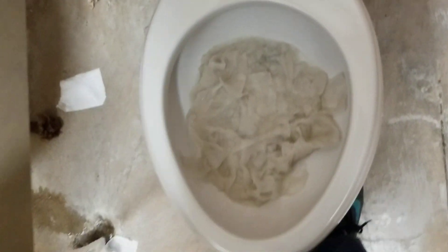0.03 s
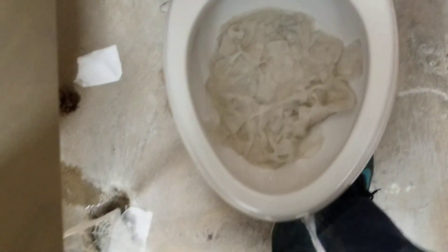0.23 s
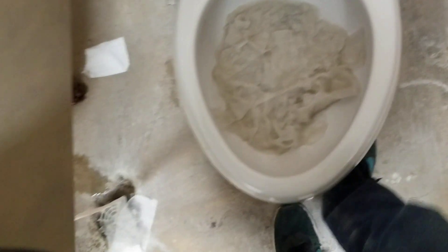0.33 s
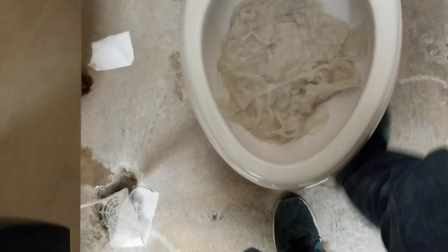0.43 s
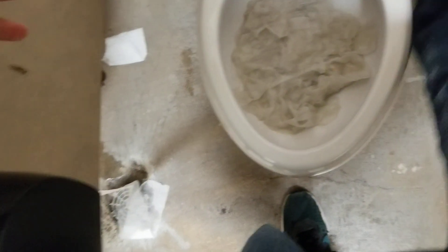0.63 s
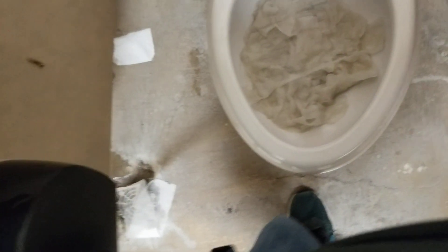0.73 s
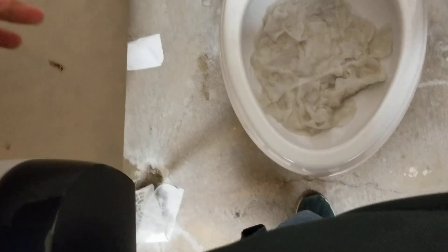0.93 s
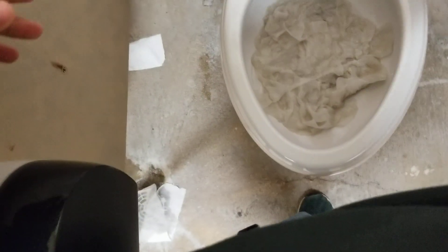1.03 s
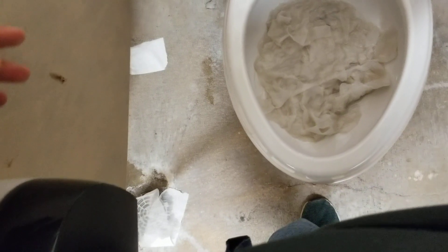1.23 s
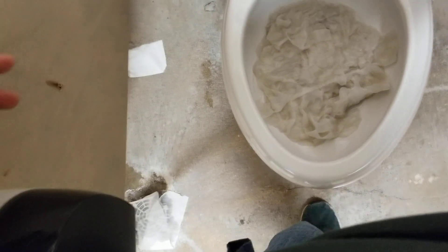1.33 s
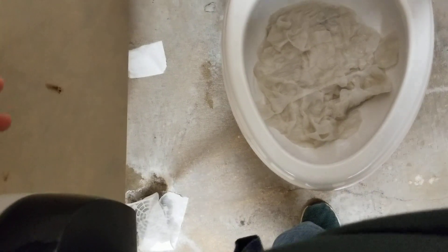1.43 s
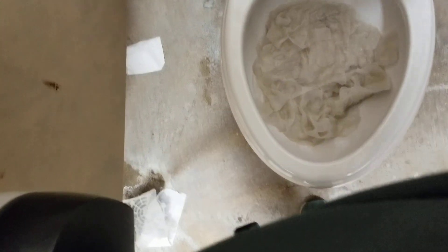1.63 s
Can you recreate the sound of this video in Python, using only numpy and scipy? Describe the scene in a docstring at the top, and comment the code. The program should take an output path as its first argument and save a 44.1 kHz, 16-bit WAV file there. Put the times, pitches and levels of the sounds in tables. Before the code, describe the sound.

In a hard, echoing bathroom, a stall door slams, booms and clatters as it settles. A lighter knock of the door follows, while close clothing rustles softly and a shoe slides faintly over low room rumble.

```python
"""In a hard, echoing bathroom, a toilet stall door bangs against its frame, rebounds and rattles to rest.
Each impact cracks, excites the damped modes of the door and sets the room reverberating, while the
panel's lowest mode booms under the clatter. Friction makes clothes rustle close to the microphone and
a shoe slide faintly, over a low room rumble. Near the end the door is knocked again, lightly."""
import sys
import numpy as np
from scipy import signal
from scipy.fft import rfft, irfft, next_fast_len
from scipy.io import wavfile

SR = 44100
rng = np.random.default_rng(int(sys.argv[2]) if len(sys.argv) > 2 else 0)


def bounce(signal):
    """Save signal as a 16-bit WAV file at the path given by the first command-line argument."""
    frames = np.transpose(np.atleast_2d(signal))
    limited = np.clip(frames, -1, 1)
    pcm = np.round(limited * 32767).astype(np.int16)
    wavfile.write(sys.argv[1], SR, pcm)


N = 74970
T = np.arange(N) / SR
RISE_CYCLES = 1.2  # a resonance builds up over a number of periods, so bass swells slowest
# correlation between the two channels (f/Hz, coherence/1)
COHERENCE = [(60, .999), (130, 1), (280, 0.9), (550, .62), (1000, 0.03), (2500, 0.03), (16000, 0)]


def amp(db):
    """Amplitude ratio of a level in decibels."""
    return 10 ** (np.asarray(db) / 20)


def curve(points, hz):
    """Interpolation on a logarithmic frequency axis."""
    f, value = np.transpose(points)
    return np.interp(np.log(hz + 1), np.log(f + 1), value)


def add(mix, s, sound):
    """Superposition: a sound joins the mix at s seconds."""
    part = mix[:, round(s * SR):][:, :sound.shape[-1]]
    part += sound[..., :part.shape[1]]


def pan(db):
    """Level difference between the channels; positive is to the left."""
    return amp(np.array([[db], [-db]]) / 2)


def diffuse_spectra(white):
    """Diffuse-field coherence: two channels agree at long wavelengths and part at short ones."""
    spectra = rfft(white)
    hz = np.fft.rfftfreq(white.shape[1], 1 / SR)
    coherence = curve(COHERENCE, hz)
    mid = np.sqrt((1 + coherence) / 2) * spectra[0]
    side = np.sqrt((1 - coherence) / 2) * spectra[1]
    return hz, np.array([mid + side, mid - side])


def noise(colour):
    """Spectral shaping of white noise gives steady, coloured stereo noise."""
    hz, spectra = diffuse_spectra(rng.standard_normal((2, next_fast_len(N, True))))
    return irfft(spectra * amp(curve(colour, hz)))[:, :N]


def background():
    """Ambient noise: a rumble, amplitude-modulated by movement, under a steady hiss."""
    # spectra of the room's hiss and of the rumble of room and handled microphone (f/Hz, level/dB)
    hiss_colour = [(20, -53), (500, -53.5), (1000, -52.5), (2200, -58.5), (4500, -54.5), (8000, -58),
                   (16000, -69)]
    rumble_colour = [(20, -42), (45, -29), (80, -19.5), (125, -24.5), (185, -34), (250, -29), (330, -40.5),
                     (480, -38), (800, -51), (2000, -62), (16000, -80)]
    # envelope of the rumble (t/s, level/dB)
    rumble_level = [(0, -4.5), (.17, 0), (.6, -0.5), (1.0, -4), (1.15, -4), (1.25, -0.5), (1.35, -2.5),
                    (1.45, 2), (1.55, -4), (1.63, 4), (1.7, 7)]
    return noise(rumble_colour) * amp(np.interp(T, *np.transpose(rumble_level))) + noise(hiss_colour)


def shoes():
    """Sliding friction: a sole gives faint swells of noise as the weight shifts."""
    # dry slides on the floor (centre t/s, half-width t/s, level/dB)
    slides = [(0.085, 0.2, -4.5), (1.614, 0.046, 0)]
    # spectrum of a slide (f/Hz, level/dB)
    colour = [(100, -48), (350, -35), (600, -38), (1100, -45), (1800, -47), (3000, -50), (6000, -62),
              (16000, -85)]
    return noise(colour) * sum(amp(db) * np.exp(-((T - s) / half) ** 2) for s, half, db in slides)


def clothes():
    """Friction noise of cloth: grainy rubbing and thin scuffs on the right, soft swishes of a sleeve."""
    # envelope of the rubbing (t/s, level/dB)
    rub_level = [(0, -5.5), (.11, -1.5), (.19, -7.5), (.4, 1.5), (.62, 3.5), (.77, 0.5), (.87, 0),
                 (.97, -2), (1.05, 2), (1.1, -5), (1.16, -2), (1.26, -2.5), (1.4, -2), (1.47, 0),
                 (1.61, -1), (1.7, 7)]
    # sudden scuffs (onset t/s, level/dB, fade t/s)
    scuffs = [(.789, 5, 0.046), (1.298, -3, 0.049), (1.618, 3, 0.063)]
    # sleeve swishes (peak t/s, rise t/s, fall t/s, level/dB)
    swishes = [(.12, 0.035, 0.1, -4), (1.04, 0.04, 0.13, -1.5)]
    # spectra of the three (f/Hz, level/dB)
    rub_colour = [(1000, -68), (4000, -63.5), (7000, -62), (9000, -56.5), (11000, -56), (13000, -51.5),
                  (16000, -56.5)]
    scuff_colour = [(1000, -80), (7000, -68), (9500, -53), (11000, -50), (12000, -54), (13200, -43),
                    (16000, -51)]
    swish_colour = [(500, -58), (2500, -62.5), (3600, -45.5), (4500, -41.5), (5800, -53), (9000, -54),
                    (16000, -76)]
    grain_db, scuff_rise_s = 1.7, 0.0026
    grain = amp(grain_db * np.repeat(rng.standard_normal(N), 64)[:N])
    bursts = sum(amp(db) * np.clip((T - s) / scuff_rise_s, 0, 1) * np.exp(-abs(T - s) / fade_s)
                 for s, db, fade_s in scuffs)
    swells = sum(amp(db) * np.exp(-((T - s) / np.where(T < s, rise, fall)) ** 2)
                 for s, rise, fall, db in swishes)
    rubbing = noise(rub_colour) * amp(np.interp(T, *np.transpose(rub_level)))
    scuffing = bursts * noise(scuff_colour)
    return (rubbing + scuffing) * grain * pan(db=-11) + swells * noise(swish_colour)


def panel(hz=85.9, t60=3.8, rise_s=0.014, stop_s=0.023):
    """Free vibration: the panel's lowest mode booms on until contact damps it."""
    # booms of the whole panel (onset t/s, level/dB, free vibration t/s)
    booms = [(0.211, -27, .335), (0.770, -41, 0.22), (1.405, -36, .06), (1.605, -44, .1)]
    out = np.zeros((2, N))
    for s, db, free_s in booms:
        envelope = np.minimum(T / rise_s, 1) * amp(db - 60 * T / t60)
        damping = np.exp(-np.maximum(T - free_s, 0) / stop_s)
        add(out, s, envelope * damping * np.sin(2 * np.pi * hz * T))
    return out


def excitation_db(hz, bass_db, tilt_db, note_hz):
    """Excitation spectrum: heavy blows add bass, hard ones treble; the struck spot favours its note."""
    note_lift = np.exp(-(np.log2((hz + 1) / note_hz) / 0.67) ** 2)
    return bass_db / (1 + (hz / 350) ** 2) + tilt_db * np.log2(1 + hz / 900) + note_lift


def reverberation(touch, ripple, size=65536, rise_s=0.0075, early_db=6, early_s=0.039):
    """Diffuse reverberation: each band builds up and decays exponentially at its own rate."""
    # spectrum of the bathroom's echo before it decays (f/Hz, level/dB)
    colour = [(40, -32), (75, -13), (125, -13), (190, -18), (240, -5), (278, -12.5), (330, -10), (400, -14),
              (500, -9.5), (600, -8), (680, -7), (760, -17), (950, -16), (1200, -18), (1750, -13),
              (2200, -23), (2650, -17), (3300, -19.5), (3800, -25), (5100, -25.5), (6300, -33),
              (8500, -37.5), (16000, -42)]
    # reverberation time by band (f/Hz, T60/s)
    bands = [(80, 1.4), (250, 1.49), (600, 1.58), (1200, 1.25), (2000, 1.14), (3500, 0.92), (6000, 0.73),
             (12000, 0.32)]
    t = np.arange(size) / SR
    hz, spectra = diffuse_spectra(rng.standard_normal((2, size)))
    spectra *= amp(curve(colour, hz) + curve(ripple, hz) + excitation_db(hz, *touch))
    spectra *= np.where(hz > 750, pan(db=-2.5), 1)
    centres = [f for f, _ in bands]
    out = 0
    for (f, t60), weights in zip(bands, np.eye(len(bands))):
        band = irfft(spectra * curve(np.c_[centres, weights], hz))
        build_up = 1 - np.exp(-(t / (rise_s + RISE_CYCLES / f / 2)) ** 2)
        out += band * build_up * amp(-60 * t / t60)
    return out * amp(early_db * np.exp(-t / early_s))  # stronger while still inside the stall


def ring(touch, size=65536, phase_spread=0.9):
    """Damped oscillation: decaying tones whose phases part between the channels as pitch rises."""
    # a low lingering hum, then ringing tones of the door and frame (f/Hz, level/dB, T60/s)
    tones = [(124.8, -33.5, 1.8), (158, -35, 1.0), (222.6, -39, 1), (245.8, -29.5, 0.51),
             (298, -24.5, 0.59), (452, -22, 0.41), (532, -33.5, 0.75), (567.3, -28.5, 0.46),
             (625.4, -25, 0.93), (682, -31, 0.6), (964, -32, 0.52), (1042, -25.5, 0.26), (1658, -37, .8),
             (1806, -31.5, 0.51)]
    t = np.arange(size) / SR
    out = 0
    for k, (hz, db, t60) in enumerate(tones):
        phase_gap = (-1) ** k * phase_spread * np.arccos(curve(COHERENCE, hz))
        build_up = 1 - np.exp(-t * hz / RISE_CYCLES)
        decay = amp(db + excitation_db(hz, *touch) - 60 * t / t60)
        out += build_up * decay * np.sin(2 * np.pi * hz * t + phase_gap * np.array([[.5], [-.5]]))
    return out


def crack(touch, ripple, size=8192, hold_s=0.0012, t60=0.055, length_s=0.12, direct=1.9):
    """Impulse response: a sharp onset and its dense early reflections off the stall walls."""
    # spectrum of the impact (f/Hz, level/dB)
    colour = [(40, -11.5), (90, -11), (200, 0), (400, -10), (620, 2), (850, -1.5), (1500, -0.5), (2200, -4),
              (3200, -6), (4000, -14), (6100, -13.5), (7500, -25), (9000, -30.5), (16000, -35.5)]
    t = np.arange(size) / SR
    density = 6000 / SR  # 6000 reflections a second
    signs = np.sign(rng.standard_normal((2, size)))
    reflections = signs * (rng.random((2, size)) < density) / np.sqrt(density)
    decay = amp(-60 * np.maximum(t - hold_s, 0) / t60) * (t < length_s)
    hz, spectra = diffuse_spectra(reflections * decay)
    log_gain = np.log(amp(curve(colour, hz) + excitation_db(hz, *touch) + .5 * curve(ripple, hz)))
    # a minimum-phase filter colours the impact and keeps its onset sharp
    mirrored = np.r_[log_gain, log_gain[-2:0:-1]]
    minimum_phase = np.exp(np.conj(signal.hilbert(mirrored)))[:len(hz)]
    return irfft((spectra + direct) * minimum_phase)


def door():
    """Impact excitation: every bang has a crack, an echo, a ring, a thump and a hollow note."""
    # blows on the frame and, in the second row, the first slam's reflection off a wall
    # (t/s, level/dB, bass/dB, treble tilt/dB per octave, echo/dB,
    # left minus right/dB, hollow note f/Hz, note/dB, ring/dB)
    bangs = [(0.2057, 1, -12, 1.15, -4.5, -1, 631, -12.5, -1),
             (0.2200, -14.5, 9, 0.5, 6, 1.5, 663, -14, -13.5),
             (0.2313, -3.5, 1, 0.73, -3.5, 0.5, 598, -9.5, -1),
             (0.4012, -10, -7.5, -0.07, 1, -1, 586, -10.5, -6.5),
             (0.4217, -14, 2, -1, -8, -9, 518, -21, 0.5), (0.5075, -16, -4, -1.5, -1.5, 1.5, 526, -9.5, 3),
             (0.5354, -15, 0.5, -1.63, -0.5, -2, 559.5, -14.5, -1.5),
             (0.554, -20.5, 2, -2.5, -6.5, -5, 600, -28, 6), (0.600, -33.5, 8, -4.5, 8, 5, 607, 8, 8.5),
             (1.6268, -28.5, -20, 1, 4.5, -2, 950, -12.5, -4),
             (1.6750, -14.5, -3.5, -1, 1.5, 0.5, 478, -9, 1.5)]
    thump_hz, thump_s = 71.6, 0.0222
    note_rise_s, note_t60 = 0.0033, 0.08
    ripple_hz, ripple_db = 28, 2.0  # the door's many close resonances ripple its spectrum
    ripple = np.c_[ripple_hz * np.arange(900), ripple_db * rng.standard_normal(900)]
    thump = amp(-34) * T / thump_s * np.exp(1 - T / thump_s) * np.sin(2 * np.pi * thump_hz * T)
    note_envelope = (1 - np.exp(-T / note_rise_s)) * amp(-60 * T / note_t60) * pan(db=4)
    out = np.zeros((2, N))
    for s, db, bass_db, tilt_db, echo_db, pan_db, note_hz, note_db, ring_db in bangs:
        touch = bass_db, tilt_db, note_hz
        add(out, s, amp(db) * pan(pan_db) * crack(touch, ripple))
        add(out, s, amp(db + echo_db) * reverberation(touch, ripple))
        add(out, s, amp(db + ring_db) * ring(touch))
        add(out, s, amp(db + bass_db) * thump)
        add(out, s, amp(db + note_db) * note_envelope * np.sin(2 * np.pi * note_hz * T))
    return out


def scene():
    """Linear superposition of door, panel, clothes, shoes and room."""
    return door() + panel() + clothes() + shoes() + background()


def record(dry, cutoff_hz=15950):
    """Soft saturation rounds the loudest peaks, then a low-pass filter limits the band."""
    saturated = dry / (1 + dry ** 4) ** .25
    low_pass = signal.firwin(511, cutoff_hz, window=("kaiser", 9), fs=SR)
    return signal.oaconvolve(saturated, low_pass[None], "same")


dry = scene()
out = record(dry)
bounce(out)
```